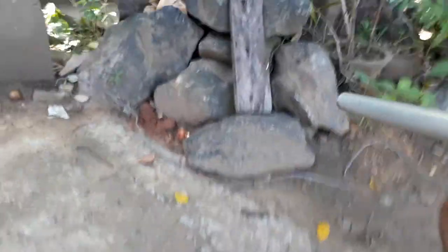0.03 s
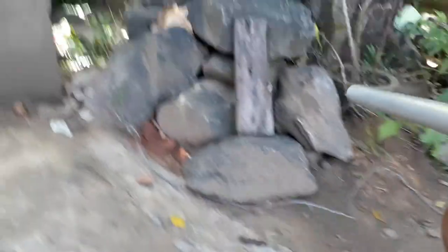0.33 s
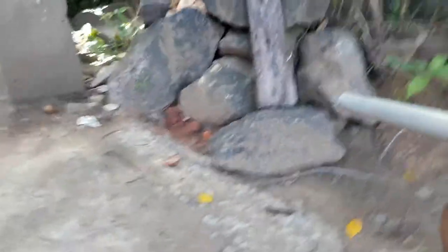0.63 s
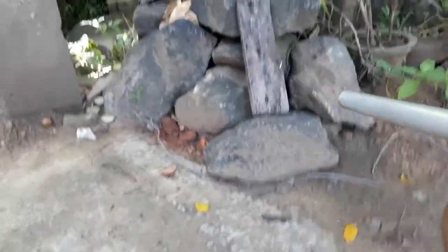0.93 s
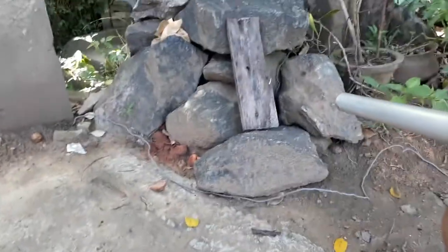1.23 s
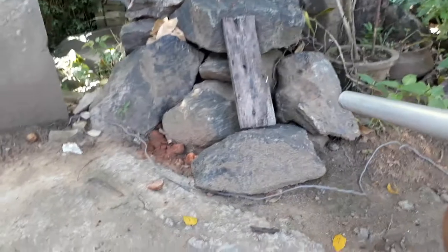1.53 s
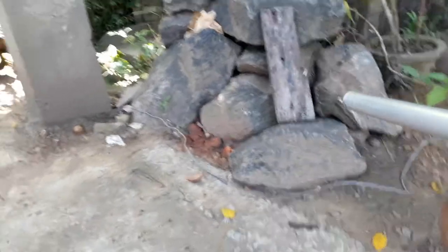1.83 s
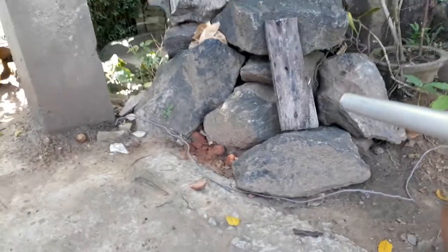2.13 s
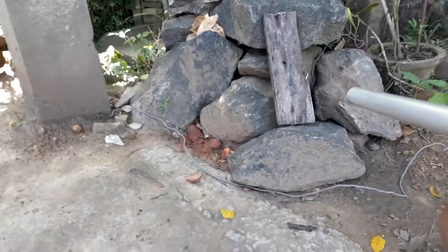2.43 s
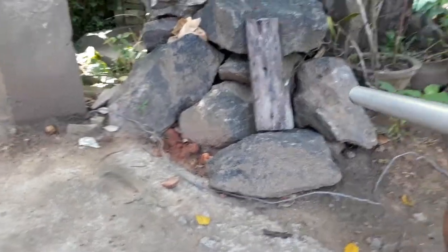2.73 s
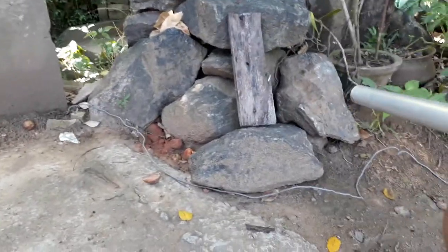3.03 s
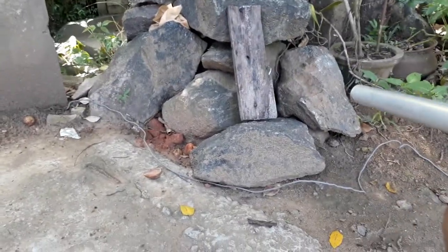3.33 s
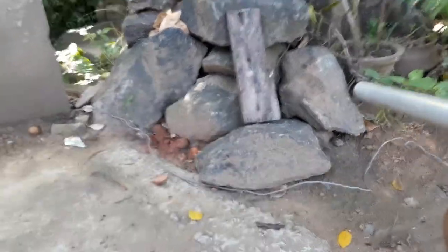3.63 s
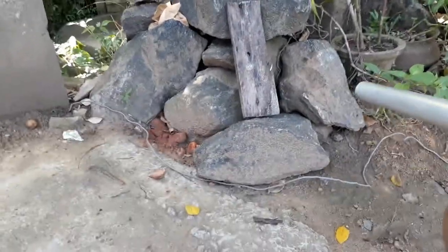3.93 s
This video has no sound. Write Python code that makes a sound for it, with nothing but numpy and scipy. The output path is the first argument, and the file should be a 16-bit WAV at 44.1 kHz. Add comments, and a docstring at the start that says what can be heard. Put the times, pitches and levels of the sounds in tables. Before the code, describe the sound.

An air gun fires once outdoors, a loud pop and short hiss after faint handling.

```python
"""A yard, where a home-made air gun is aimed at a pile of rocks and fired once, close by.
Over still air, far insects and a distant motor come a gritty scuff, swishes of cloth, faint squeaks
and hands rubbing and bumping the hollow pipe. Then the valve knocks, the seal spits, air bursts from
the barrel in a low blast, and the tank hisses empty through the ringing pipe. The rocks throw back
part of the hiss; the shot overloads the microphone and ducks its gain."""
import sys
import numpy as np
from scipy import signal
from scipy.fft import rfft, irfft
from scipy.io import wavfile
from scipy.ndimage import uniform_filter1d

SR = 44100
rng = np.random.default_rng(int(sys.argv[2]) if len(sys.argv) > 2 else 0)


def generate_wav(sig):
    """Save sig (samples, or channels by samples) to the path in sys.argv[1] as 16-bit PCM at SR."""
    pcm = np.round(np.clip(np.atleast_2d(sig).T, -1, 1) * 32767).astype(np.int16)
    wavfile.write(sys.argv[1], SR, pcm)


N = 176400
T = np.arange(N) / SR
JET_S = 3.569  # the tank starts to empty
CLICK_T60_S, CLICK_TOP_HZ = .016, 2300


def from_db(db):
    """Decibels to gain."""
    return 10 ** (np.asarray(db) / 20)


def rms_one(x):
    """Scale to unit power."""
    return x / np.sqrt(np.mean(x ** 2) + 1e-20)


def cut(x, hz, kind, order=2):
    """Butterworth filter."""
    return signal.sosfilt(signal.butter(order, np.clip(hz, 10, .45 * SR), kind, fs=SR, output="sos"), x)


def noise(spectrum):
    """Unit-power noise shaped by (f/Hz, level/dB) points, rolling off below the first."""
    hz, db = np.transpose(spectrum)
    f = np.maximum(np.arange(N // 2 + 1) * SR / N, 1)
    gain = from_db(np.interp(np.log(f), np.log(hz), db)) * np.minimum(f / hz[0], 1) ** 2
    return rms_one(irfft(rfft(rng.standard_normal(N)) * gain, N))


def band(hz, width_hz):
    """Unit-power noise in one narrow band."""
    return rms_one(cut(rng.standard_normal(N), [hz - width_hz / 2, hz + width_hz / 2], "band"))


def wander(rate_hz):
    """Smooth random drift of unit power."""
    return rms_one(cut(rng.standard_normal(N), rate_hz, "low"))


def flutter(rate_hz, depth_db):
    """A randomly wavering gain."""
    return from_db(depth_db * wander(rate_hz))


def since(s):
    """Time elapsed after s."""
    return np.maximum(T - s, 0)


def burst(s, fall_db_per_s, attack_s=0.00053):
    """Envelope with a quick attack, then a steady fall in dB."""
    return np.minimum(since(s) / attack_s, 1) * from_db(-np.minimum(fall_db_per_s * since(s), 300))


def ring(s, hz, t60):
    """A damped sine struck at s."""
    return np.sin(2 * np.pi * hz * since(s)) * np.exp(-np.minimum(np.log(1000) * since(s) / t60, 40))


def crack(s, t60):
    """A short puff of white noise."""
    return rng.standard_normal(N) * burst(s, 60 / t60, attack_s=.0001)


def strokes(rows):
    """Envelope of strokes that each rise, hold, then lose 40 dB per fall time."""
    return sum(np.minimum(since(s) / rise, 1) * from_db(db - 40 * since(s + rise + hold) / fall)
               for s, rise, hold, fall, db in rows)


def grains(per_s, spread_db):
    """Random clicks of uneven size."""
    clicks = (rng.random(N) < per_s / SR) * rng.choice([-1, 1], N)
    return clicks * from_db(spread_db * np.minimum(rng.exponential(1, N), 4))


def resonate(x, modes):
    """Pass x through parallel resonances; unit power."""
    out = 0
    for hz, width, db in modes:
        mode = cut(x + 1e-18, [hz - width / 2, hz + width / 2], "band", order=1)
        out += from_db(db) * rms_one(mode)
    return rms_one(out)


def background():
    """The outdoor bed: still air, a thin band of far insects and a distant motor's hum."""
    # tone of the open air: f/Hz, relative level/dB
    air_spectrum = [(24, -38), (40, 2), (433, -10.5), (516, -13), (2570, -19), (4930, -25), (6650, -19),
                    (7730, -29.5), (16000, -27.5)]
    # swell and fade of the motor: t/s, level/dB
    hum_levels = [(0, -67.5), (1.3, -73), (1.6, -62.5), (2.1, -73), (4, -79)]
    hum = from_db(np.interp(T, *np.transpose(hum_levels))) * band(hz=106.3, width_hz=7.6)
    air = from_db(-64.5) * noise(air_spectrum)
    insects = from_db(-70) * band(hz=6670, width_hz=490)
    return air + insects + hum


def squeaks():
    """Faint squeaks and groans: short, unsteady gliding tones."""
    # glides: t/s, length/s, start f/Hz, end f/Hz, level/dB
    glides = [(0.796, 0.077, 406, 365, -51.5), (0.855, 0.042, 233, 221, -56.5),
              (1.982, 0.23, 833, 846, -67)]
    wobble = 1 + .032 * wander(rate_hz=200)
    out = 0
    for s, length, hz, end_hz, db in glides:
        progress = np.minimum(since(s) / length, 1)
        pitch_hz = (hz + (end_hz - hz) * progress) * wobble
        out += from_db(db) * np.sin(np.pi * progress) * np.sin(2 * np.pi * np.cumsum(pitch_hz) / SR)
    return out * flutter(rate_hz=34, depth_db=2.5)


def ticks():
    """Thin, dry ticks of treble noise."""
    # ticks: t/s, level/dB
    hits = [(.5538, -42), (2.528, -50)]
    return sum(from_db(db) * burst(s, 60 / CLICK_T60_S) for s, db in hits) * band(4400, width_hz=1100)


def rubbing():
    """Hands rub the pipe: friction swells and fades, and tiny slips ring the hollow."""
    # tone of the friction: f/Hz, relative level/dB
    friction_spectrum = [(110, -3), (260, 1), (380, 3), (600, -2), (1000, -11.5), (1500, -11.5),
                         (2100, -18.5), (3500, -15), (5000, -22.5), (8300, -28), (9200, -13), (10000, -21),
                         (16000, -29.5)]
    # pipe resonances under the hand: f/Hz, width/Hz, relative level/dB
    hollow_modes = [(800, 60, -1), (1319, 110, -1), (1478, 120, -2.5), (3270, 200, -12), (3900, 200, -16),
                    (9200, 250, -15)]
    # rubs: centre t/s, half length/s, friction level/dB, hollow level/dB
    rubs = [(.03, 0.065, -55, -59), (0.274, 0.018, -55, -52.5), (.45, 0.025, -58.5, -69.5),
            (0.613, 0.018, -52.5, -46), (0.664, 0.017, -51.5, -52), (0.776, 0.017, -55.5, -61),
            (0.878, 0.037, -62.5, -67.5), (1.011, 0.013, -57.5, -67), (1.334, 0.023, -64.5, -75),
            (1.441, 0.022, -57.5, -71), (1.624, 0.028, -57, -64.5), (1.713, 0.017, -56.5, -63.5),
            (1.928, 0.021, -57, -63), (2.324, 0.021, -64.5, -70), (2.413, 0.013, -56.5, -58)]
    friction = noise(friction_spectrum)
    hollow = resonate(grains(per_s=2500, spread_db=2.5), hollow_modes)
    out = 0
    for s, half, friction_db, hollow_db in rubs:
        swell = 1 / (1 + ((T - s) / half) ** 2 / 2)
        out += swell * (from_db(friction_db) * friction + from_db(hollow_db) * hollow)
    return out * flutter(rate_hz=120, depth_db=1.5)


def bumps():
    """Hands bump the pipe, each time with a dull thud and a click."""
    # bumps: t/s, level/dB, thud f/Hz, relative click level/dB
    hits = [(0.5518, -30, 204, 3.5), (2.403, -50, 233, 10), (2.62, -43, 243, 2), (2.6811, -43, 340, 2.5)]
    out = 0
    for s, db, hz, click_db in hits:
        click = from_db(click_db) * cut(crack(s, CLICK_T60_S), CLICK_TOP_HZ, "low")
        out += from_db(db) * (ring(s, hz, t60=.024) + click)
    return cut(out, hz=153, kind="high")


def scuffs_and_cloth():
    """Grit crackles under a sliding stroke, single grains snap louder, and cloth swishes softly."""
    # gritty scuffs: t/s, rise/s, hold/s, fall/s, level/dB
    scuffs = [(-.02, 0.011, 0.1, 0.18, -47), (.102, 0.016, 0.041, 0.096, -33.5),
              (.2, 0.011, 0.038, 0.13, -60)]
    # cloth swishes: t/s, rise/s, hold/s, fall/s, level/dB
    swishes = [(1.28, 0.024, 0.024, 0.42, -65), (1.57, 0.04, 0.07, 0.87, -68.5),
               (2.42, 0.096, 0.094, 0.43, -65.5), (3.18, 0.12, 0.11, 0.58, -65.5)]
    # snapping grains: t/s, level/dB
    snaps = [(.0033, -34.5), (0.043, -47), (0.0848, -38), (.1495, -28), (.156, -31), (.174, -36),
             (0.215, -42), (0.236, -42), (.501, -47), (0.5525, -47), (1.339, -53), (1.412, -48),
             (1.425, -57)]
    # tone of all three: f/Hz, relative level/dB
    spectrum = [(88, -29.5), (200, -11), (600, -14), (1060, -8), (2310, -4), (5250, -6), (6390, -4.5),
                (7620, -12), (8730, -2), (16000, -15.5)]
    grit_decay_s, snap_t60_s = .0003, .0066
    pole = np.exp(-1 / (grit_decay_s * SR))
    crackle = rms_one(signal.lfilter([1], [1, -pole], np.abs(grains(per_s=7000, spread_db=3))))
    snapping = sum(from_db(db) * burst(s, 60 / snap_t60_s, attack_s=.0001) for s, db in snaps)
    return (strokes(scuffs) * crackle + snapping + strokes(swishes)) * noise(spectrum)


def yard_tail():
    """Walls and leaves scatter a faint tail after the shot."""
    # tone of the tail: f/Hz, relative level/dB
    spectrum = [(100, -14.5), (300, -12), (1000, -11), (2500, 3), (4500, 4.5), (7500, -2), (9000, 8),
                (12000, -9), (16000, -34)]
    return from_db(-27) * burst(JET_S, fall_db_per_s=84, attack_s=.04) * noise(spectrum)


def with_rock_echo(hiss):
    """The rocks throw back the middle of the hiss as one short slap."""
    delay_s = .034
    delayed = np.interp(T - delay_s, T, hiss)
    return hiss + from_db(-5) * cut(delayed, hz=[3900, 4900], kind="band")


def valve():
    """The valve's knocks ring the plastic body; the latch also clicks."""
    # knocks of the mechanism: t/s, level/dB
    knocks = [(3.4902, -37), (3.5192, -16), (3.522, -9)]
    # body modes: f/Hz, relative level/dB, t60/s
    modes = [(383, -14.5, 0.038), (727, 1, 0.02), (1321, -13.5, 0.085), (1475, 2.5, 0.019),
             (2420, -20, 0.014), (4100, -26.5, 0.01)]
    contact_s = .00065
    out = 0
    for s, db in knocks:
        body = sum(from_db(mode_db) * ring(s, hz, t60) for hz, mode_db, t60 in modes)
        out += from_db(db) * body * np.minimum(since(s) / contact_s, 1)
    latch = cut(crack(s=3.519, t60=.035), CLICK_TOP_HZ, "low", order=1)
    return out + from_db(-32) * latch


def seal():
    """Air seeps, then spits and whistles as the seal cracks open."""
    # tone of the spit: f/Hz, relative level/dB
    spectrum = [(200, -15), (450, -7), (1200, -14), (3000, -9), (5000, -13.5), (9000, -7.5), (10500, -4),
                (14000, -18.5), (16000, -11)]
    # whistles of the narrow gap and the muzzle: t/s, f/Hz, width/Hz, level/dB, fall/(dB/s)
    whistles = [(3.5515, 7300, 450, -9, 1108.5), (3.554, 12660, 450, -14, 170.5),
                (3.572, 2206, 200, -10, 601)]
    seep = from_db(-41) * burst(s=3.542, fall_db_per_s=250)
    spit = from_db(-10) * burst(s=3.5513, fall_db_per_s=250)
    air = (seep + spit) * noise(spectrum)
    return air + sum(from_db(db) * burst(s, fall) * band(hz, width)
                     for s, hz, width, db, fall in whistles)


def blast():
    """The barrel empties in two surges of low turbulence, thumping as it clears."""
    # tone of the turbulence: f/Hz, relative level/dB
    spectrum = [(45, -17.5), (70, -12), (120, 4), (180, -11.5), (300, 1.5), (600, -4), (1200, -10.5),
                (2300, -13), (5000, -30.5), (12000, -29)]
    # surges: t/s, time until the fall steepens/s, level/dB
    surges = [(3.5677, 0.018, -3), (3.604, .01, -10)]
    # thumps of the barrel and its air column: t/s, f/Hz, level/dB, t60/s
    thumps = [(3.4972, 190.3, -30, 0.073), (3.5684, 303.5, 1, 0.034), (3.57, 125, -5, .07),
              (3.5989, 128.8, -1, 0.074), (3.6125, 125, -7, .03), (3.665, 164, -17, .035)]
    fall_db_per_s, extra_fall_db_per_s = 198.5, 900
    envelope = sum(burst(s, fall_db_per_s) * from_db(db - extra_fall_db_per_s * since(s + length))
                   for s, length, db in surges)
    return envelope * noise(spectrum) + sum(from_db(db) * ring(s, hz, t60) for s, hz, db, t60 in thumps)


def jet():
    """The sputtering hiss sinks with tank pressure, then dies fast once the flow is no longer choked."""
    # tone of the jet: f/Hz, relative level/dB
    spectrum = [(60, -29), (250, -22.5), (470, -17), (750, -12), (1400, -9.5), (2600, -1.5), (4600, -2.5),
                (5700, -3), (6900, -1), (7900, -10), (8800, 2), (10500, -2.5), (13000, -5.5),
                (16000, -13.5)]
    # pipe resonances blown by the jet: f/Hz, width/Hz, relative level/dB
    pipe_modes = [(470, 40, -9), (1425, 50, -5), (2025, 45, -4), (3240, 35, -7), (3568, 35, -2),
                  (4250, 200, -1), (4500, 80, -1), (4885, 60, -3), (6780, 70, -3), (8800, 200, 0),
                  (9385, 50, -4), (10085, 50, -3)]
    choked_s, knee_s = .17, .02
    choked_db_per_s, emptying_db_per_s = 31.5, 322
    pitch_ratio = 1 + .0025 * wander(rate_hz=25)  # the pipe's pitch wanders with the flow
    steady_pipe = resonate(rng.standard_normal(N), pipe_modes)
    pipe = np.interp(np.cumsum(pitch_ratio) / SR, T, steady_pipe)
    emptying_s = knee_s * np.logaddexp(0, (T - JET_S - choked_s) / knee_s)
    extra_fall_db = (emptying_db_per_s - choked_db_per_s) * emptying_s
    envelope = burst(JET_S, choked_db_per_s, attack_s=.0018) * from_db(-5.5 - extra_fall_db)
    hiss = noise(spectrum) + from_db(-4) * pipe
    return envelope * hiss * flutter(rate_hz=180, depth_db=1.1)


def scene():
    """The shot, the handling and the outdoor bed, all in the centre."""
    shot = valve() + seal() + blast() + with_rock_echo(jet()) + yard_tail()
    mix = shot + scuffs_and_cloth() + rubbing() + bumps() + squeaks() + background() + ticks()
    return np.array([mix, mix])


def gain_control(x):
    """Loud sound turns the gain down, and it stays down."""
    threshold_db, max_duck_db, attack_s = -17, 8.5, .045
    level_db = 10 * np.log10(np.abs(uniform_filter1d(x ** 2, size=441)) + 1e-12)
    duck_db = np.maximum.accumulate(np.clip(level_db - threshold_db, 0, max_duck_db))
    pole = np.exp(-1 / (attack_s * SR))
    return from_db(-signal.lfilter([1 - pole], [1, -pole], duck_db))


def record(dry):
    """The microphone loses the deep bass, ducks too late and overloads; the top is cut."""
    ceiling, top_hz = .82, 15700
    ducked = cut(dry, hz=70, kind="high") * gain_control(dry[0])
    clipped = ducked / (1 + (ducked / ceiling) ** 6) ** (1 / 6)
    return signal.sosfilt(signal.ellip(12, .1, 90, top_hz, fs=SR, output="sos"), clipped)


dry = scene()
out = record(dry)
generate_wav(out)
```